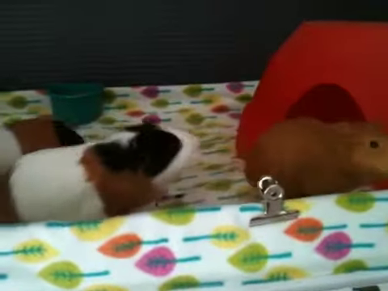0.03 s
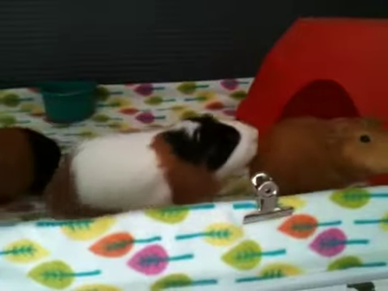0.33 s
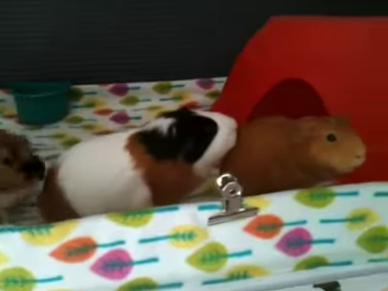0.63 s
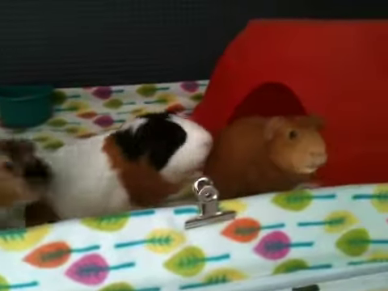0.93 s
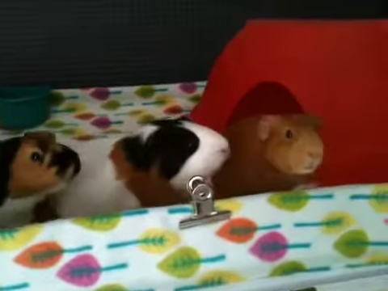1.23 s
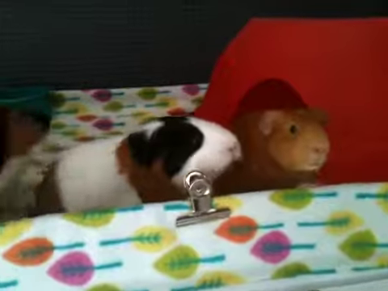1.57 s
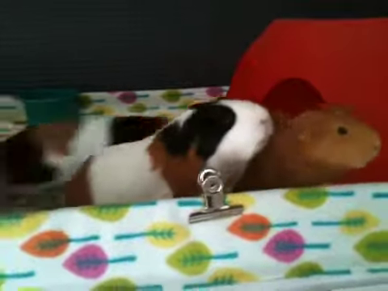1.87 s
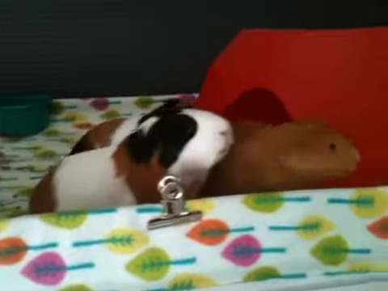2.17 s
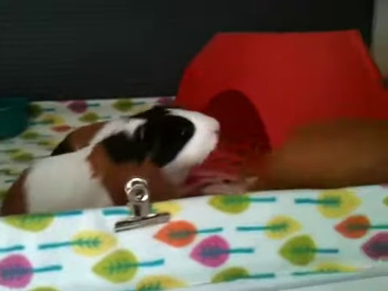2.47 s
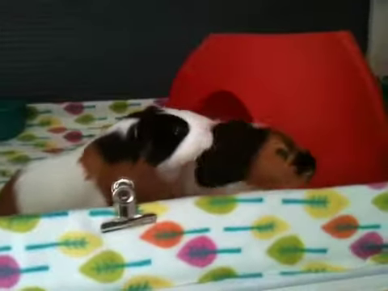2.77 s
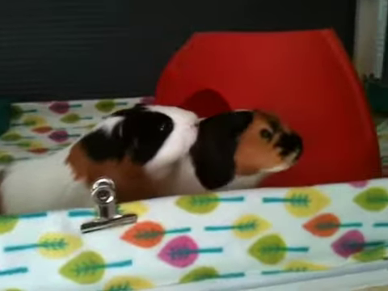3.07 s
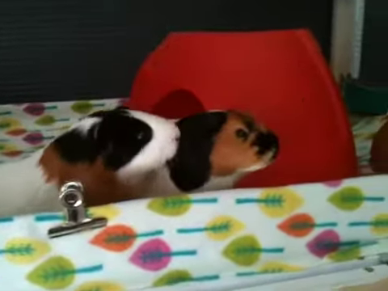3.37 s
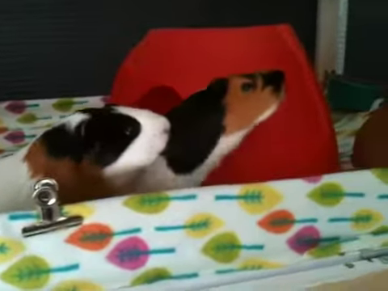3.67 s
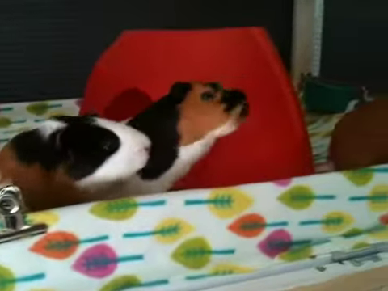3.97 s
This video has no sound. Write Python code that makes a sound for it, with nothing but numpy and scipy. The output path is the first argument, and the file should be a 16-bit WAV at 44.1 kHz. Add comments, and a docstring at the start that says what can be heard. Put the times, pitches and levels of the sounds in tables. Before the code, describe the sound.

In a quiet small room, nearby guinea pigs keep up a string of rising, whistling squeals, some loud and some soft. Under them come faint rustles, light claw scratches and a few dull paw steps on fleece.

```python
"""Guinea pigs wheeking in a pen

Several animals call over one another in a fleece-lined pen in a small room.
Each call scoops up from a soft low note; the eager ones go on into a loud rising whistle.
Bedding rustles, claws scratch, bodies brush the fleece and paws thud on the pen floor.
The room rings briefly over its quiet air."""
import sys
import numpy as np
from scipy import signal
from scipy.fft import rfft, irfft
from scipy.io import wavfile

SR = 44100
rng = np.random.default_rng(int(sys.argv[2]) if len(sys.argv) > 2 else 0)


def pcm_store(signal):
    """Save signal as 16-bit PCM."""
    levels = np.round(np.clip(np.atleast_2d(signal), -1, 1) * 32767)
    wavfile.write(sys.argv[1], SR, levels.astype(np.int16).T)


N = 176400
ATTACK_S, RELEASE_S, JITTER_HZ = 0.006, 0.005, 130  # both kinds of call


def amp(db):
    """Decibels to gain."""
    return 10 ** (np.asarray(db) / 20)


def unit(x):
    """Scale to rms 1."""
    return x / np.sqrt(np.mean(x ** 2) + 1e-20)


def read(points, hz):
    """Interpolate (frequency, value) points on a log-frequency axis."""
    freqs, values = np.transpose(points)
    return np.interp(np.log(hz + 1), np.log(freqs), values)


def add(mix, start_s, sound):
    """Mix a sound in at start_s."""
    part = mix[max(round(start_s * SR), 0):][:len(sound)]
    part += sound[:len(part)]


def colour(x, spectrum):
    """Filter by a spectrum in dB; result at rms 1."""
    gain = amp(read(spectrum, np.fft.rfftfreq(N, 1 / SR)))
    return unit(irfft(rfft(x) * gain, N))


def wander(t, top_hz):
    """Smooth random motion, rms about 1, in the decade below top_hz."""
    rates = np.geomspace(top_hz / 10, top_hz, 20)[:, None]
    return np.sin(2 * np.pi * (rates * t + rng.random(rates.shape))).sum(0) / np.sqrt(10)


def fade(t, start_s, end_s):
    """Voice envelope: attack before start_s, release after end_s."""
    return np.clip((t - start_s) / ATTACK_S + 1, 0, 1) * np.clip((end_s - t) / RELEASE_S + 1, 0, 1)


def partial(t, cycles, clean, rasp, rasp_hz):
    """One harmonic: a clean line with a noise skirt of +/- rasp_hz."""
    skirt = wander(t, rasp_hz) + 1j * wander(t, rasp_hz)
    return ((np.sqrt(2) * clean + rasp * skirt) * np.exp(2j * np.pi * cycles)).real


def air(level_db=-58.5):
    """Steady, quiet room noise."""
    # (frequency [Hz], level [dB])
    spectrum = [(30,-46),(55,-41),(85,-30),(130,-8),(260,-6),(500,-8.5),(660,-2.5),(1050,-8.5),(1400,-4.5),(2200,-4),(3200,-8),(6500,-3.5),(8700,-13.5),(11000,-20.5),(13000,-12),(15500,-34)]
    return amp(level_db) * colour(rng.standard_normal(N), spectrum)


def room(x, tail_db=-13.5, build_s=0.02, early_db=-11.5, early_s=0.018, echoes=8):
    """Direct sound, a few echoes off the pen walls, then a diffuse tail."""
    # reverberation: (frequency [Hz], T60 [s])
    t60 = [(300,0.46),(2500,0.38),(3800,0.58),(6000,0.25),(14000,0.14)]
    hz, t, noise = signal.stft(rng.standard_normal(SR), SR, nperseg=256)
    decay = amp(-60 * t / read(t60, hz)[:, None])
    tail = signal.istft(noise * decay, SR, nperseg=256)[1]
    tail *= np.minimum(np.arange(len(tail)) / SR / build_s, 1) ** 2
    response = amp(tail_db) * tail / np.linalg.norm(tail)
    delays_s = early_s * rng.uniform(0.09, 1, echoes)
    for delay_s, sign in zip(delays_s, rng.choice([-1, 1], echoes)):
        response[round(delay_s * SR)] += sign * amp(early_db) / np.sqrt(echoes)
    return x + signal.fftconvolve(x, response)[:N]


def scuffs(rise_s=0.019):
    """Bodies brush the fleece: dull rubbing that starts quickly and eases off."""
    # (start [s], length [s], level [dB])
    rubs = [(2.521,0.05,-58.5),(2.972,0.14,-53.5),(3.326,0.081,-58),(3.42,0.87,-65.5)]
    # (frequency [Hz], level [dB])
    spectrum = [(60,-38),(150,-35),(340,10.5),(560,0.5),(850,-4),(1300,11.5),(1700,-5),(3000,-18),(12000,-19)]
    pressure = np.zeros(N)
    for start_s, length_s, db in rubs:
        t = np.arange(0, length_s, 1 / SR)
        add(pressure, start_s, amp(db) * np.minimum(t / rise_s, 1) * (1 - (t / length_s) ** 2))
    return pressure * colour(rng.standard_normal(N), spectrum)


def scratches(grain_db=3, grain_hz=220):
    """Claws on fleece: short, bright, grainy scrapes."""
    # (centre [s], half width [s], level [dB])
    strokes = [(.905, 0.02, -54), (1.435, 0.036, -61.5), (1.801, 0.018, -56.5), (2.191, 0.035, -59),
               (3.3, 0.013, -61), (3.625, 0.0074, -52.5)]
    # (frequency [Hz], level [dB])
    spectrum = [(4000, -27), (7500, -12), (9200, 5), (11000, -4), (13000, -34)]
    t = np.arange(N) / SR
    envelope = sum(amp(db) * np.exp(-((t - s) / width_s) ** 2 / 2) for s, width_s, db in strokes)
    grain = amp(grain_db * wander(t, grain_hz))
    return envelope * grain * colour(rng.standard_normal(N), spectrum)


def paws(rise_s=0.003):
    """Dull, quickly damped thuds on the padded floor."""
    # (time [s], level [dB], decay [s])
    steps = [(1.293,-46,0.0053),(1.33,-57,0.0065),(1.631,-46,0.0048),(1.929,-49,0.0039),
             (2.542,-49,0.008),(3.363,-57,0.0092),(3.41,-58,0.0078),(3.447,-53.5,0.018),(3.864,-57.5,0.017)]
    # (frequency [Hz], level [dB])
    spectrum = [(40,-42),(75,-49),(120,-3.5),(200,3),(340,5.5),(550,-36),(900,-11),(1400,-57),(3000,-14),(12000,-42)]
    t = np.arange(SR // 2) / SR
    push = np.zeros(N)
    for start_s, db, decay_s in steps:
        add(push, start_s, amp(db) * np.minimum(t / rise_s, 1) * np.exp(-t / decay_s))
    return push * colour(rng.standard_normal(N), spectrum)


def bedding(floor_db=-79.5, snaps_per_s=1200, crackle=0.21, spread_db=14, flicker_db=1, flicker_hz=45):
    """Swells of fine hiss and crackle as the animals shuffle."""
    # (centre [s], half width [s], level [dB])
    rustles = [(.18,0.039,-48),(.32,0.053,-50),(0.569,0.083,-48.5),(.66,0.019,-54.5),(0.723,0.028,-50.5),(.92,0.084,-50),
               (1.18,0.13,-57),(1.45,0.18,-58.5),(1.87,0.1,-56.5),(2.0,0.041,-50),(2.108,0.092,-52.5),(2.2,0.022,-56),(2.28,0.067,-49.5),(2.439,0.13,-48.5),(2.68,0.067,-47.5),
               (2.84,0.064,-48.5),(3.012,0.045,-47),(3.11,0.072,-50.5),(3.299,0.16,-56.5),(3.565,0.048,-52),(3.625,0.088,-48.5),(3.866,0.081,-46)]
    # (frequency [Hz], level [dB])
    spectrum = [(300,-16),(1000,-10.5),(2300,-1),(3200,-2),(4200,0),(6200,2),(7800,1.5),(9200,0.5),(11000,-3),(12500,-12.5),(15500,-13)]
    t = np.arange(N) / SR
    power = sum(amp(db) ** 2 * np.exp(-((t - s) / width_s) ** 2) for s, width_s, db in rustles)
    envelope = np.sqrt(amp(floor_db) ** 2 + power)
    snaps = (rng.random(N) < snaps_per_s / SR) * rng.choice([-1, 1], N)
    sizes = amp(spread_db * np.minimum(rng.exponential(1, N), 2))
    grain = crackle * unit(snaps * sizes) + (1 - crackle) * rng.standard_normal(N)
    return colour(grain, spectrum) * envelope * amp(flicker_db * wander(t, flicker_hz))


def scoop(length_s, low_hz, end_hz, hoarse, drop=0.1943, jitter=0.0085, swell_db=2.6, thin_db=1.5):
    """A soft low note sags, then sweeps up, the sooner the higher it aims; hoarseness roughens it."""
    # voice colour: (frequency [Hz], gain [dB])
    spectrum = [(480,-5.5),(600,-8.5),(740,-3),(980,-8),(1350,2.5),(1800,-2.5),(2500,-1),(4000,-12),(9000,-52)]
    t = np.arange(0, length_s + RELEASE_S, 1 / SR)
    progress = np.minimum(t / length_s, 1)
    turn = 1 / (1 + np.sqrt(abs(end_hz / low_hz - 1) / drop))  # progress at the lowest pitch
    sag = np.maximum(1 - progress / turn, 0)
    rise = np.maximum(progress - turn, 0) / (1 - turn)
    rise = np.sin(0.97 * rise) / np.sin(0.97)  # eases at the top
    glide_hz = low_hz * (1 + drop * sag ** 2) + (end_hz - low_hz) * rise ** 2.1
    hz = glide_hz * (1 + jitter * wander(t, JITTER_HZ))
    cycles = np.cumsum(hz) / SR
    if end_hz < 1.55 * low_hz:  # a small rise stays a nearly pure coo
        fall_db_per_oct = 27
    else:
        fall_db_per_oct = 10
        hoarse = np.clip(hoarse + 0.3 * rise, 0, 1)
    tone = 0
    for k in range(1, 6):
        db = read(spectrum, k * hz) - fall_db_per_oct * np.log2(k) - thin_db * rise ** 2
        db += swell_db * wander(t, top_hz=45)
        tone += amp(db) * partial(t, k * cycles, np.sqrt(1 - hoarse), np.sqrt(hoarse), rasp_hz=260)
    return tone * fade(t, ATTACK_S, length_s)


def whistle(track, jitter=0.003, shimmer_db=0.7, flutter_db=1.6, fall_db=3, rasp=0.14):
    """A clean, trembling tone climbs under raspy overtones; high pitch strains the voice."""
    # throat response for harmonics above the 4th: (frequency [Hz], gain [dB])
    throat = [(7000,9),(9000,9.5),(10500,-0.5),(12500,-4.5),(15500,-23)]
    times_s, pitch_hz, *levels_db = np.transpose(track)
    t = np.arange(max(times_s[0] - ATTACK_S, 0), times_s[-1] + RELEASE_S, 1 / SR)
    glide_hz = np.interp(t, times_s, pitch_hz)
    h1_db, h2_db, h3_db, h4_db = (np.interp(t, times_s, db) for db in levels_db)
    strain = np.clip((glide_hz - 2600) / 600, 0, 1)
    tremble = (1 + 0.6 * strain) * jitter * wander(t, JITTER_HZ)
    # a weak voice glides less evenly
    kink = np.interp(np.maximum(h1_db, h2_db), [-44, -30], [0.011, 0.003]) * (1 - strain / 2)
    hz = glide_hz * (1 + tremble + kink * wander(t, top_hz=70))
    cycles = np.cumsum(hz) / SR
    upper = np.arange(4, 8)[:, None]  # harmonics 4-7
    throat_db = read(throat, upper * hz) - fall_db * upper
    upper_db = h4_db + throat_db - throat_db[0]
    harmonics_db = np.array([h1_db - 0.25, h2_db - 0.04, h3_db + 1.8, *(upper_db + 1.8)])
    harmonics_db[1:] += flutter_db * wander(t, top_hz=110)
    tone = 0
    for k, db in enumerate(harmonics_db, 1):
        gain = amp(db + shimmer_db * wander(t, JITTER_HZ)) * (k * hz < SR / 2)
        tone += gain * partial(t, k * cycles, 1, rasp * np.sqrt(k - 1), rasp_hz=800)
    return t[0], tone * fade(t, times_s[0], times_s[-1])


def guinea_pigs():
    """Overlapping calls: low scoops, alone or leading into a whistle."""
    # one track per whistle: (time [s], pitch [Hz], levels of harmonics 1, 2, 3, 4 [dB])
    whistles = [
        [(0.0, 2208, -34, -50, -45.5, -42), (0.022, 2356, -29, -59.0, -48, -41.5),
         (0.034, 2390, -31.5, -56.0, -47.0, -43), (0.042, 2580, -34.5, -47.5, -63, -61),
         (0.062, 2763, -34.5, -42.5, -52, -70.5), (0.085, 3160, -56, -58.0, -89.0, -96.0)],
        [(0.075, 1897, -62, -59, -68, -68), (0.12, 2134, -41.5, -56, -85, -56.5),
         (0.15, 2453, -41.5, -77.0, -51, -79)],
        [(0.14, 3600, -47, -60, -73, -83.5), (0.147, 3680, -51.5, -37.0, -57, -62.5),
         (0.18, 3758, -35, -43.5, -55, -65), (0.22, 3940, -39, -34.5, -56, -76.5),
         (0.24, 3987, -37, -37.5, -72, -93.5), (0.252, 3970, -55, -62, -56, -86.0)],
        [(0.45, 1884, -48.5, -64.5, -66, -65), (0.49, 2069, -38, -67, -58, -63),
         (0.53, 2226, -34.5, -58, -67, -48), (0.6, 2403, -31.5, -60, -60.5, -74),
         (0.622, 2587, -40, -71, -75, -84), (0.652, 2950, -42.0, -53, -78, -80),
         (0.68, 3130, -50.5, -54.5, -76.0, -83.5)],
        [(0.51, 1854, -45, -72.5, -78, -74.0), (0.525, 1897, -47.5, -73.0, -51, -75),
         (0.551, 2152, -41, -54, -36.5, -52), (0.574, 2382, -34, -61, -63, -46.5)],
        [(0.905, 1860, -48, -58, -52, -64), (0.93, 2200, -37, -52, -49, -49), (0.947, 2233, -35, -68, -50, -39),
         (0.963, 2550, -48.5, -64.5, -56, -72)],
        [(0.95, 1750, -50, -63, -62, -60), (1.0, 2080, -31.5, -63.0, -50.5, -47),
         (1.046, 2154, -25, -60, -56, -57), (1.085, 2288, -27, -41, -50.5, -48.5),
         (1.122, 2411, -27.0, -37, -44.5, -57), (1.145, 2630, -32, -37.0, -45.5, -66),
         (1.165, 2860, -41.0, -36, -37.5, -48), (1.205, 3024, -39.5, -37.5, -51, -61),
         (1.255, 3480, -49, -39.5, -59, -59.0), (1.264, 3430, -39, -42.5, -67.0, -77.5)],
        [(1.218, 1890, -53.0, -52, -63.0, -83.5), (1.245, 1990, -47.5, -53, -54, -56),
         (1.268, 2323, -49, -93, -59, -60)],
        [(1.522, 1878, -54, -61, -73, -82.5), (1.545, 1940, -41.5, -68, -68, -61),
         (1.608, 2252, -32.5, -60.5, -59, -63), (1.62, 2436, -36.5, -67, -60, -62),
         (1.63, 2888, -51.0, -64, -49.5, -75), (1.645, 3017, -49, -60, -54.5, -87.0)],
        [(1.795, 1783, -52, -59.5, -93.5, -72), (1.815, 1863, -48.5, -70.5, -60.5, -66),
         (1.835, 2170, -53.5, -57, -43.5, -45.5), (1.845, 2270, -35, -55, -52.5, -41),
         (1.865, 2387, -36, -51, -46, -41.5), (1.88, 2520, -32, -48.5, -55, -53),
         (1.908, 2850, -40, -35, -44.5, -60), (1.94, 2922, -41, -47.5, -58, -81.5)],
        [(2.2, 1827, -49, -84.5, -82.0, -76.0), (2.215, 1930, -49, -70, -57, -77.0),
         (2.235, 2244, -54, -83, -50, -51)],
        [(2.26, 1850, -60, -63.5, -45.5, -60), (2.285, 2224, -40, -69.0, -46, -49.5),
         (2.306, 2225, -36, -62.0, -50, -46), (2.322, 2590, -45, -79, -81.0, -77.5)],
        [(2.297, 2740, -48.0, -73, -72, -62.5), (2.32, 2862, -44.5, -50, -65, -75.0),
         (2.355, 2786, -48, -50.5, -64, -79), (2.388, 3280, -51, -46.5, -85.5, -81.5)],
        [(2.622, 1689, -51.5, -65.5, -67, -49), (2.648, 2017, -41, -65, -36.0, -57),
         (2.68, 2350, -30, -53, -47, -48.5), (2.71, 2630, -29, -47.5, -57, -58),
         (2.732, 2950, -39.5, -39.5, -67, -84), (2.749, 3246, -35, -28, -63, -79.0),
         (2.789, 3550, -36.5, -56, -41, -68), (2.835, 3805, -39, -38, -50.5, -63.0),
         (2.875, 3710, -43.5, -72, -72, -85.0)],
        [(2.68, 2025, -45, -65.0, -60.0, -68), (2.73, 2148, -32.5, -63, -83, -69),
         (2.778, 2352, -28.5, -52, -43, -78), (2.822, 2526, -21.5, -51, -33, -58),
         (2.856, 2677, -25, -42.5, -43.5, -48.5), (2.885, 2910, -39, -37.5, -44, -71.5),
         (2.908, 3100, -33, -47, -81, -75)],
        [(3.105, 1770, -59, -77, -58, -62.0), (3.127, 2067, -44.5, -63, -41, -67),
         (3.155, 2310, -33, -70, -50, -50.5), (3.17, 2530, -51, -69, -77, -83)],
        [(3.44, 2066, -60.0, -69, -64.5, -88.0), (3.46, 2181, -55.5, -77.0, -67, -70.5),
         (3.485, 2270, -54, -74.5, -69, -71)],
        [(3.788, 1868, -59, -69.0, -65, -72.5), (3.815, 1963, -53, -58.0, -38.5, -68),
         (3.841, 2220, -33, -63.0, -46.5, -48.5), (3.861, 2330, -32.5, -49, -51, -42.5),
         (3.88, 2640, -38.5, -56.5, -75.5, -73)],
    ]
    # (start [s], length [s], lowest pitch [Hz], end pitch [Hz], level [dB], hoarseness [0-1])
    scoops = [(0.2,0.031,678,860,-53.5,0.2),(0.303,0.14,560,1897,-52,0),(0.401,0.1,613,1727,-50,0.34),(0.7,0.14,640,1366,-53.5,0),
              (0.782,0.11,532,1823,-53,0),(0.824,0.11,538,1710,-54,0),(0.979,0.11,611,890,-52,0),(1.112,0.11,514,1673,-50,0.03),
              (1.234,0.12,587,1047,-56,0),(1.402,0.13,570.4,1934,-49,0.09),(1.521,0.081,698,1740,-52.5,0.06),(1.68,0.11,625,1773,-55,0.02),
              (1.777,0.14,631,2332,-47.5,0),(2.044,0.14,637,1798,-49.5,0),(2.133,0.11,573.4,1710,-52,0.4),(2.325,0.083,586,826,-55,0.3),
              (2.519,0.11,574,1642,-49,0.1),(2.585,0.058,635,840,-55.5,0.06),(2.792,0.08,632,807,-51,0.03),(2.993,0.098,562.6,1650,-53,0.35),
              (3.049,0.085,608,1476,-51.5,0.5),(3.308,0.14,470.7,2007,-52.5,0.28),(3.396,0.094,575,840,-58.5,0.08),(3.642,.135,560,1720,-51.5,0.2),
              (3.694,0.082,714,884,-55,0.03),(3.868,0.11,663,1285,-57,0.36),(3.946,0.072,623,690,-53.5,0)]
    voices = np.zeros(N)
    for track in whistles:
        add(voices, *whistle(track))
    for start_s, length_s, low_hz, end_hz, db, hoarse in scoops:
        add(voices, start_s, amp(db) * scoop(length_s, low_hz, end_hz, hoarse))
    return voices


def scene():
    """Calls and movement in the room, over its air; mono."""
    voices = guinea_pigs()
    background = air()
    pen = voices + bedding() + scratches() + paws() + scuffs()
    return (room(pen) + background)[None]


def record(dry, low_hz=85, cutoff_hz=15750):
    """A small microphone loses the deep bass; the recorder limits the top."""
    highpass = signal.butter(2, low_hz, "highpass", fs=SR, output="sos")
    lowpass = signal.firwin(511, cutoff_hz, window=("kaiser", 9), fs=SR)
    return signal.oaconvolve(signal.sosfilt(highpass, dry), lowpass[None], "same")


dry = scene()
out = record(dry)
pcm_store(out)
```